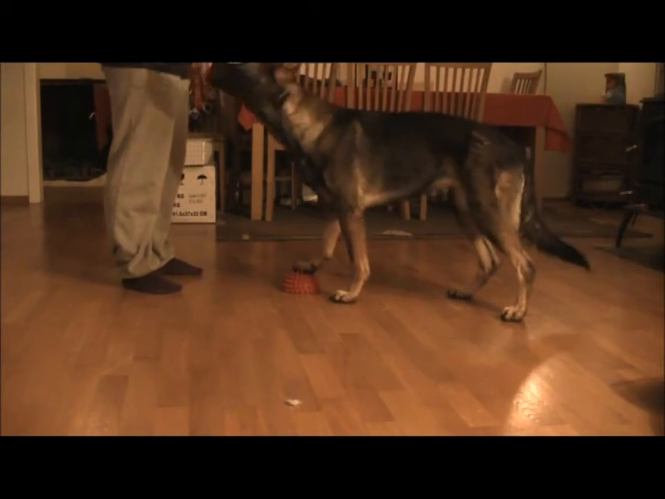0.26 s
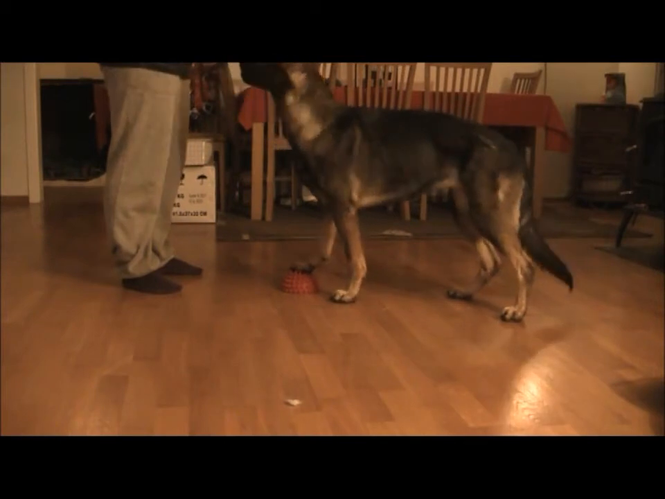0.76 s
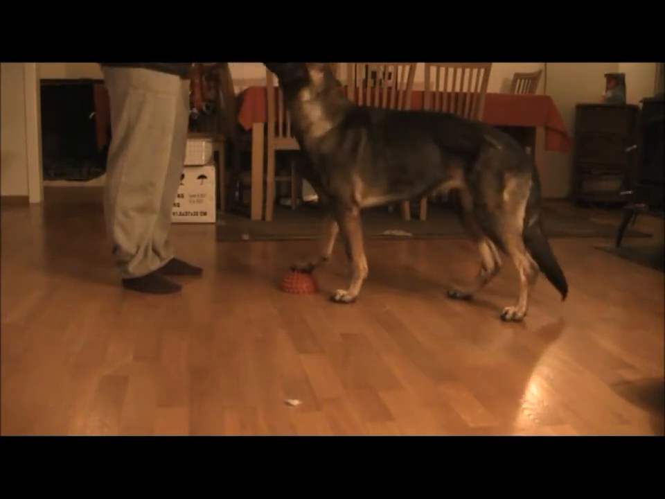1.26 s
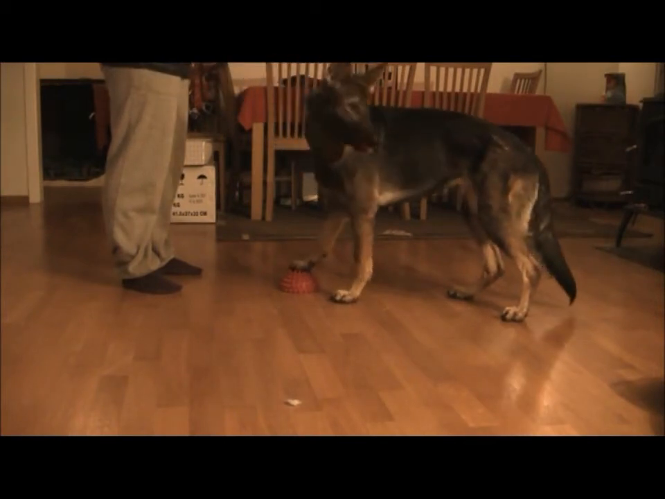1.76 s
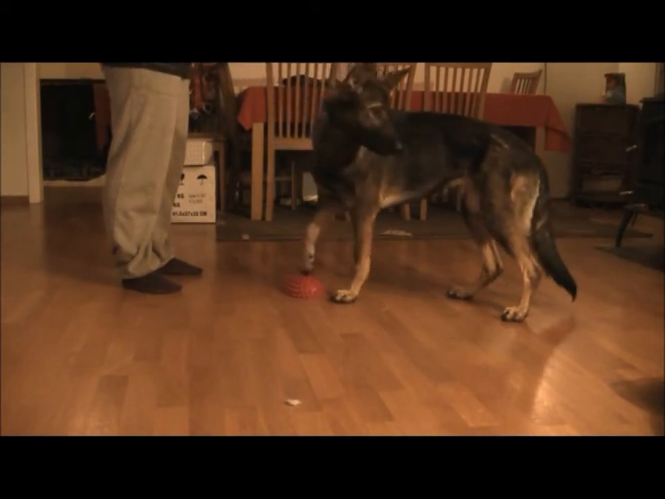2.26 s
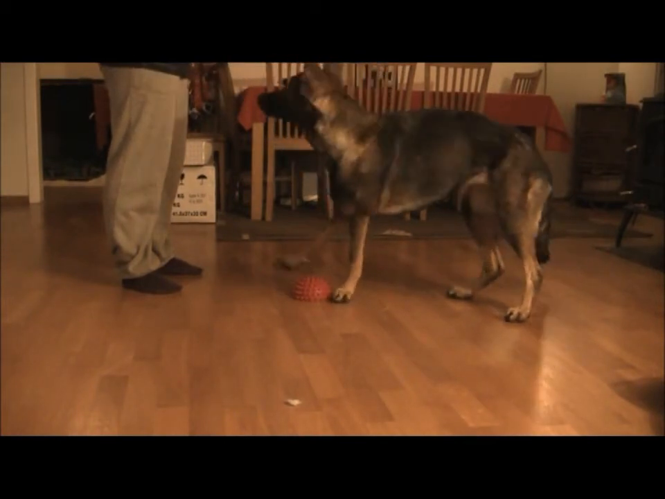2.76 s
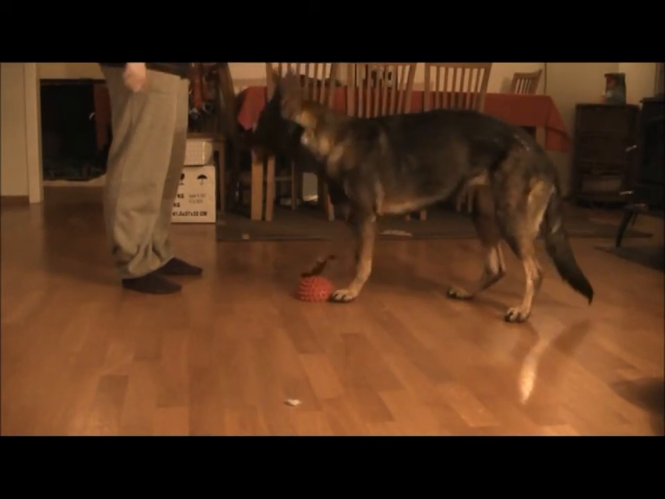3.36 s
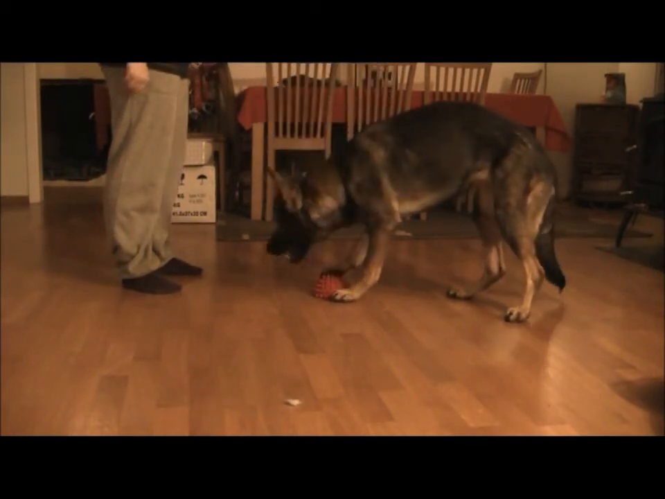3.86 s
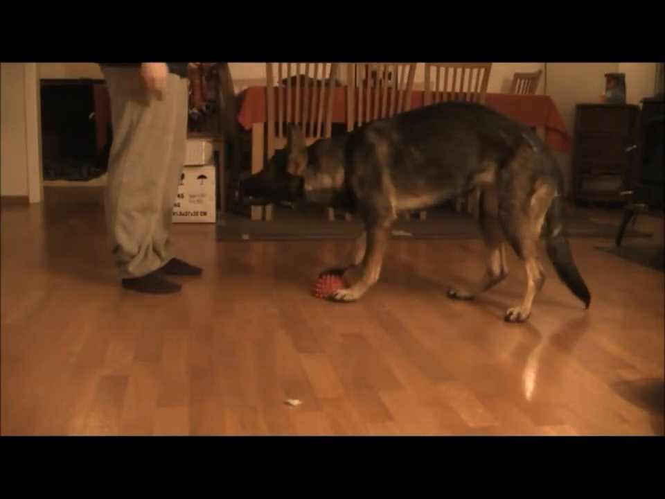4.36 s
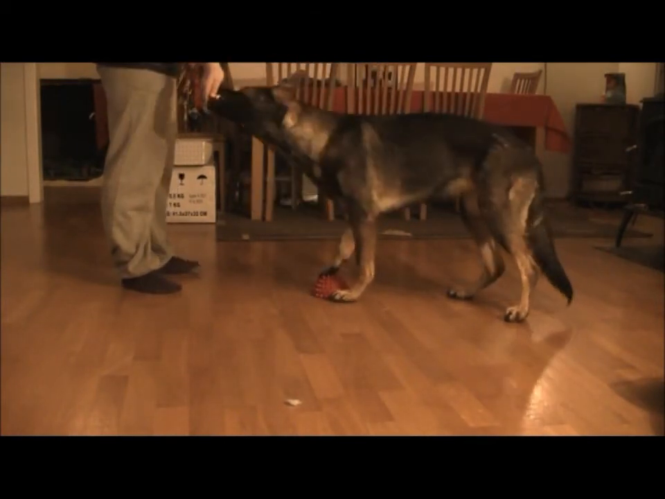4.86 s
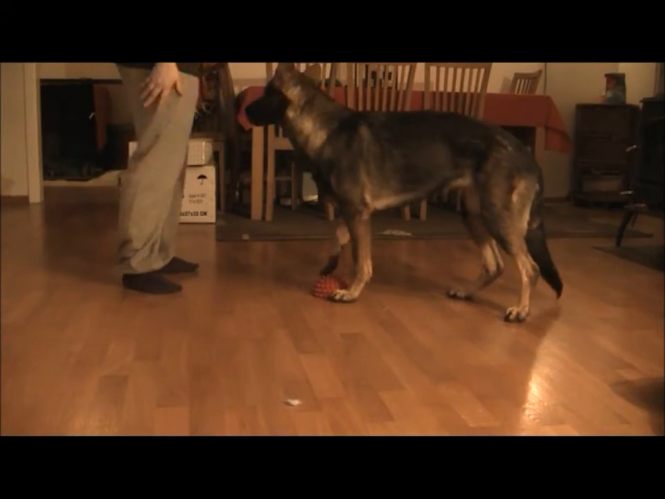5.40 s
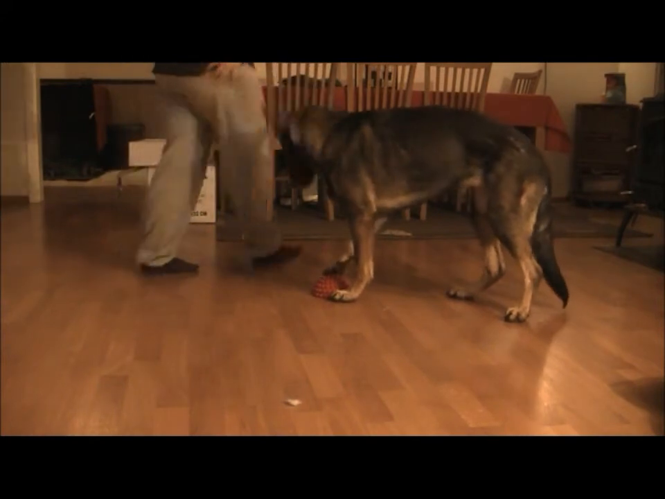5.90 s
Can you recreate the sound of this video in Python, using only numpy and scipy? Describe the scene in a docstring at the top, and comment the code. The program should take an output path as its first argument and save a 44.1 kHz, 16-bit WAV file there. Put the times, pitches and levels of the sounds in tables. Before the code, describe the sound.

A large dog's claws clack and pads thud lightly on a hardwood floor indoors, with one loud sharp knock midway, over faint camera hiss.

```python
"""A large dog shifts its feet around a rubber toy on a hardwood floor in a living room.
Claws clack as short damped resonances; pads thud as shaped clicks and scuff as runs of tiny slips.
One loud sharp knock, as it lunges down, is a broad blow with hard contacts and ringing boards.
Hollow clacks of the jaws, rasps, faint squeaks and bright pips come in between.
Random reflections make the room ring briefly, over the hiss and hum of a small camera."""
import sys
import numpy as np
from scipy import signal
from scipy.fft import rfft, irfft
from scipy.io import wavfile
from scipy.ndimage import uniform_filter1d

SR = 44100
rng = np.random.default_rng(int(sys.argv[2]) if len(sys.argv) > 2 else 0)


def dump(signal):
    """Clip the signal to [-1, 1] and save it as 16-bit WAV at the path in sys.argv[1]."""
    limited = np.clip(np.atleast_2d(signal).T, -1, 1)
    pcm = np.round(limited * 32767).astype(np.int16)
    wavfile.write(sys.argv[1], SR, pcm)


N = 270628


def gain_of(db):
    """Decibels to an amplitude factor."""
    return 10 ** (np.asarray(db) / 20)


def evened(x):
    """Scales to an rms of 1."""
    return x / np.sqrt(np.mean(x ** 2) + 1e-20)


def burst(x):
    """Scales a short sound to the energy of 20 ms at an rms of 1."""
    return x * np.sqrt(SR / 50 / np.sum(x ** 2))


def read(points, hz):
    """Interpolates a table on a log-frequency axis."""
    f, value = np.transpose(points)
    return np.interp(np.log(hz + 1), np.log(f + 1), value)


def add(mix, s, sound):
    """Mixes a sound in at a time in seconds."""
    part = mix[round(s * SR):][:len(sound)]
    part += sound[:len(part)]


def click(points, size=4096):
    """A causal, minimum-phase click with the given spectrum."""
    hz = abs(np.fft.fftfreq(size, 1 / SR))
    log_gain = np.log(gain_of(read(points, hz)))
    spectrum = np.exp(np.conj(signal.hilbert(log_gain)))
    return burst(np.fft.ifft(spectrum).real[:size // 2])


def ring(hz, width_hz, order=1, size=4096):
    """A damped resonance that swells and dies; a higher order has steeper spectral flanks."""
    t = np.arange(size) / SR
    envelope = t ** order * np.exp(-np.pi * width_hz * t)
    return burst(envelope * np.sin(2 * np.pi * hz * t))


def hollow(modes, pitch=1):
    """A cavity rings with several resonances at once, of alternating sign."""
    return burst(sum((-1) ** k * gain_of(db) * ring(hz * pitch, width_hz)
                     for k, (hz, width_hz, db) in enumerate(modes)))


def grains(grain_db, size=N):
    """Friction: a dense run of tiny slips of uneven size."""
    slip_db = grain_db * np.minimum(rng.exponential(1, size), 5)
    return rng.standard_normal(size) * gain_of(slip_db)


def crackle(decay_s, grain_db, size=2048):
    """Tiny slips that die away exponentially after a contact."""
    decay = np.exp(-np.arange(size) / SR / decay_s)
    return burst(grains(grain_db, size) * decay)


def drag(length_s, hz, width_hz, grain_db, glide_oct=0, fade=0.62, size=4096):
    """A short run of slips feeds one resonance, which glides by so many octaves during the run."""
    span, t = max(round(length_s * SR), 8), np.arange(size) / SR
    slips = grains(grain_db, span) * signal.windows.tukey(span, min(fade, 1))
    slips = np.pad(slips, (0, size))
    progress = np.minimum(np.arange(len(slips)) / span, 1)
    pitch_hz = hz * 2 ** (glide_oct * (progress - .5))
    # resonate at 0 Hz in the gliding frame, then shift back up
    turn = np.exp(2j * np.pi * np.cumsum(pitch_hz) / SR)
    decay = t * np.exp(-np.pi * width_hz * t)
    resonance = signal.fftconvolve(slips / turn, decay)[:len(slips)]
    return burst((turn * resonance).imag)


def paired(a, b, same):
    """Two unrelated spectra become left and right with a given likeness (-1..1)."""
    same = np.clip(same, -1, 1)
    mid, side = a * np.sqrt((1 + same) / 2), b * np.sqrt((1 - same) / 2)
    return np.array([mid + side, mid - side])


# hiss spectrum: f/Hz, relative level/dB
HISS_SPECTRUM = [(15, -31.5), (25, -18), (96, -3), (164, -7), (204, 0), (274, -6), (305, -5.5), (410, -4.5),
                 (631, -7.5), (703, -8.5), (2630, -17.5), (3440, -20), (4260, -23), (5280, -24.5),
                 (15500, -36.5)]
# hiss stereo: f/Hz, left-right likeness/-1..1
HISS_LIKENESS = [(40, -0.57), (130, -0.9), (640, -0.74), (1400, -0.92), (15000, -0.27)]
# motor hum partials: f/Hz, rms level/dB
HUM = [(100, -90.5), (199.5, -87.5), (301.5, -81.5), (651, -87.5)]


def camera(hiss_db=-64):
    """Steady microphone hiss as shaped noise and a faint motor hum as sines."""
    hz, t = np.fft.rfftfreq(N, 1 / SR), np.arange(N) / SR
    noise = rfft(rng.standard_normal((2, N)))
    z = paired(*noise, read(HISS_LIKENESS, hz)) * gain_of(read(HISS_SPECTRUM, hz))
    hum = sum(np.sqrt(2) * gain_of(db) * np.sin(2 * np.pi * (f * t + rng.random())) for f, db in HUM)
    return gain_of(hiss_db) * evened(irfft(z, N)) + hum


def lens(tick_db=-85, hz=4600, width_hz=600, share=0.68, jitter_s=0.0023):
    """The focus motor ticks very faintly on most of its 25 steps a second."""
    out, times = np.zeros(N), np.arange(.02, N / SR, .04)
    for s, (chance, late) in zip(times, rng.random((len(times), 2))):
        if chance < share:
            add(out, s + jitter_s * late, gain_of(tick_db) * ring(hz, width_hz))
    return out


# reverberation: f/Hz, t60/s
ROOM_T60 = [(80, 0.13), (170, 0.34), (480, 0.41), (1000, 0.47), (2700, 0.47), (5400, 0.36), (8000, 0.33),
            (14000, 0.22)]
# reverberation stereo: f/Hz, left-right likeness/-1..1
ROOM_LIKENESS = [(100, 0.94), (640, 0.95), (1400, 0.76), (3100, 0.55), (6800, 0.41), (15000, .05)]
# reverberation spectrum: f/Hz, relative level/dB
ROOM_COLOUR = [(100, -3.5), (600, 0.5), (1500, -4), (3000, -2), (6000, 0.5), (9000, 0), (14000, 0)]


def room(x, first_s=.003, early_db=4.0, early_s=0.011, size=256):
    """Reflections of random sign, strongest from nearby furniture; each band dies at its own speed."""
    t = np.arange(SR) / SR
    present = (rng.random((2, SR)) < .1) * (t > first_s)
    reflections = rng.choice([-1., 1.], (2, SR)) * present
    reflections *= gain_of(early_db * np.exp(-t / early_s))
    hz, at, z = signal.stft(reflections, SR, nperseg=size)
    decay_db = -60 * at / read(ROOM_T60, hz)[:, None]
    z = paired(*z, read(ROOM_LIKENESS, hz)[:, None])
    z = z * gain_of(read(ROOM_COLOUR, hz)[:, None] + decay_db)
    tail = signal.istft(z, SR, nperseg=size)[1]
    return signal.fftconvolve(x[None], tail / np.linalg.norm(tail[0]), axes=1)[:, :N]


def moving_room(x, turn_hz=17, count=3):
    """Each contact is at a slightly different spot: its time sets its mix of several reflection sets."""
    turns = turn_hz * np.arange(N) / SR
    return sum(room(x * np.sqrt(2 / count) * np.cos(2 * np.pi * (turns + k / count)))
               for k in range(count))


def low_cut(x, edge_hz=70, order=2):
    """A gentle highpass takes the deep bass out of all contact sounds and their reflections."""
    return signal.sosfilt(signal.butter(order, edge_hz, "highpass", fs=SR, output="sos"), x)


# paws, fur and cloth, before and after the lunge: t/s, body level/dB, hiss level/dB (before rest floor, trims)
RUSTLE = [
    [(0.0, -70, -69.5), (0.34, -69.5, -74), (1.14, -71.5, -75.5), (2.11, -68, -72.5), (2.24, -65.5, -68),
     (2.56, -71, -76.5), (2.85, -68, -72), (3.07, -68.5, -72), (3.36, -68.5, -73.5), (3.66, -64.5, -70)],
    [(4.05, -70.5, -75.5), (4.15, -71, -79), (4.42, -70, -74.5), (4.68, -69, -72), (4.89, -68.5, -68),
     (4.99, -68.5, -72.5), (5.19, -69, -74), (5.75, -70.5, -71.5), (5.89, -67.5, -71), (6.13, -72.5, -69.5)],
]
# dull part: f/Hz, relative level/dB
RUSTLE_BODY = [(60, -19.5), (170, 6), (350, 2), (800, 1), (1700, 2), (2600, -5), (4000, -40)]
# bright part: f/Hz, relative level/dB
RUSTLE_HISS = [(1200, -13.5), (2600, 4), (4500, -0.5), (7000, -9.5), (10000, -15.5), (15000, -22)]


def rustle(grain_db=5.0, body_db=-0.94, hiss_db=-2, body_rest_db=-73, hiss_rest_db=-77):
    """Grainy sliding noise, dull and bright, as far as its level exceeds a rest floor."""
    s, body, hiss = np.vstack(RUSTLE).T
    parts = ((body, body_rest_db, body_db, RUSTLE_BODY),
             (hiss, hiss_rest_db, hiss_db, RUSTLE_HISS))
    out, t = np.zeros(N), np.arange(N) / SR
    for level_db, rest_db, trim_db, colour in parts:
        motion = np.sqrt(np.maximum(gain_of(level_db) ** 2 - gain_of(rest_db) ** 2, 0))
        noise = evened(signal.oaconvolve(grains(grain_db), click(colour))[:N])
        out += gain_of(trim_db) * np.interp(t, s, motion) * noise
    return out


# tiny bright pips: t/s, level/dB (before trims), settled f/Hz, fall into it/share of f, swell/s
PIPS = [(0.629, -58.5, 2450, 0.082, 0.0053), (0.952, -61.5, 2420, .08, 0.0048),
        (1.120, -63.5, 3420, 0.116, 0.0084), (1.229, -76, 4670, .03, 0.0097),
        (1.553, -74, 5680, 0.11, 0.0072), (2.554, -69, 5150, 0.21, 0.0057), (3.115, -65, 3340, .1, 0.0069),
        (4.054, -65.5, 3150, 0.12, 0.0035), (4.061, -64.5, 2586, 0.093, .006),
        (4.099, -66.5, 2705, 0.14, .002), (4.354, -72, 5120, 0.16, .004)]


def pips(settle_s=0.00293, pip_db=-4.0, fuzz_db=-5.0, fuzz_width=0.12, fuzz_swells=2.6, size=4096):
    """Pings swell, drop onto their pitch and die within hundredths of a second, blurred by a crackle."""
    out, t = np.zeros(N), np.arange(size) / SR
    for s, db, hz, fall, swell_s in PIPS:
        pitch_hz = hz * (1 + fall * np.exp(-t / settle_s))
        phase = 2 * np.pi * np.cumsum(pitch_hz) / SR
        swell = (t * np.exp(-t / swell_s)) ** 2
        fuzz = drag(fuzz_swells * swell_s, hz, fuzz_width * hz, grain_db=3.5, glide_oct=-fall)
        add(out, s, gain_of(db + pip_db) * burst(swell * np.sin(phase)))
        add(out, s, gain_of(db + fuzz_db) * fuzz)
    return out


# rubbing rubber and pads: start t/s, length/s, level/dB (before trim), first f/Hz, last f/Hz,
# octave above/dB re fundamental
SQUEAKS = [(0.0, 0.0082, -54.5, 1045, 1025, -15), (3.365, 0.057, -60.5, 1325, 1186, -14),
           (3.497, 0.085, -60.5, 949, 917, -1), (4.544, .075, -58.5, 215.3, 247, -11.5),
           (4.773, 0.058, -67, 1098, 1214, -16), (6.031, 0.015, -60, 1960, 1460, -25)]


def squeaks(jitter=.03, jitter_s=.002, fade=0.72, squeak_db=-2):
    """Sticking and slipping falls into step for a moment: an unsteady gliding tone and its octave."""
    out = np.zeros(N)
    for s, length_s, db, first_hz, last_hz, octave_db in SQUEAKS:
        size = round(length_s * SR)
        wobble = uniform_filter1d(rng.standard_normal(size), max(round(jitter_s * SR), 1))
        pitch_hz = np.linspace(first_hz, last_hz, size) * (1 + jitter * evened(wobble))
        phase = 2 * np.pi * np.cumsum(pitch_hz) / SR
        tone = np.sin(phase) + gain_of(octave_db) * np.sin(2 * phase)
        tone *= signal.windows.tukey(size, min(fade, 1))
        add(out, s, gain_of(db + squeak_db) * evened(tone))
    return out


# hollow rasps: start t/s, length/s, level/dB
RASPS = [(0.268, 0.014, -64), (0.278, .02, -52.5), (0.335, 0.065, -70)]
# resonances of their hollow: f/Hz, width/Hz, relative level/dB
RASP_HOLLOW = [(780, 240, -1.5), (1995, 400, -3.5), (2790, 690, -14), (3220, 330, -20), (3940, 520, -20),
               (4920, 590, -12.5), (7050, 1000, -22)]


def rasps(grain_db=6):
    """Ragged runs of slips sound through one tube-like hollow."""
    out, cavity = np.zeros(N), hollow(RASP_HOLLOW)
    for s, length_s, db in RASPS:
        slips = grains(grain_db, round(length_s * SR))
        slips *= signal.windows.tukey(len(slips), .7)
        add(out, s, gain_of(db) * burst(signal.fftconvolve(slips, cavity)))
    return out


# hollow clacks, probably of the jaws, one list of contacts a bite: t/s, level/dB, pitch factor,
# smack/dB re clack
CLACKS = [
    [(0.7672, -67.5, 1.4, 2), (0.7698, -54.5, 0.98, 0), (0.7775, -59.5, 1.05, -1.5), (0.786, -64, 1.46, 1),
     (0.7945, -62.5, 1.13, -3)],
    [(3.2325, -54, 1.055, 2), (3.240, -56.5, 1.02, -1), (3.2505, -56, 1.02, -2)],
    [(5.3878, -70, 2.0, 0), (5.3918, -60, 1.35, -2), (5.3935, -47.5, 0.97, -12), (5.3985, -53.5, 1.03, -5),
     (5.4135, -57, 1.02, -5), (5.423, -57, 1.01, -2)],
]
# hollow of the mouth, one list a bite: f/Hz (before pitch factor), width/Hz, relative level/dB
MOUTHS = [
    [(540, 59, -11), (890, 140, -10), (1228, 230, 2.5), (1580, 260, 0), (1990, 240, -7), (2340, 260, 0.5),
     (2800, 340, -10), (3380, 960, -8), (4140, 580, -8.5), (5770, 2600, -14.5)],
    [(830, 84, -6), (1000, 200, -19), (1290, 240, 2), (1510, 240, -9), (1830, 240, 1.5), (2120, 200, -11),
     (2340, 200, -9)],
    [(853, 180, -14.5), (1172, 160, -2.5), (1380, 280, -6), (1560, 110, 0), (1820, 200, -5),
     (2400, 240, -9.5), (3150, 470, -11), (3680, 330, -16), (4240, 300, -13), (5130, 250, -16.5),
     (7260, 3000, -22.5)],
]


def jaws(smack_s=0.007, grain_db=5):
    """The teeth rattle and ring the hollow of the mouth; a short wet smack goes with each contact."""
    out = np.zeros(N)
    for contacts, modes in zip(CLACKS, MOUTHS):
        for s, db, pitch, smack_db in contacts:
            mouth = hollow(modes, pitch)
            smack = burst(signal.fftconvolve(mouth, crackle(smack_s, grain_db)))
            add(out, s, gain_of(db) * mouth)
            add(out, s, gain_of(db + smack_db) * smack)
    return out


# floor and room modes: f/Hz, relative level/dB, t60/s
BOARDS = [(97, -20.5, .55), (153.1, 0, 0.35), (175, 4, 0.35), (214, 1, 0.28), (260, -1.5, 0.36),
          (343.3, -8, 0.56), (411, -6, 0.39), (473, -1.5, 0.42), (573, 9, 0.22), (684, -3, 0.38),
          (735, -10, 0.4), (880, -5, 0.37), (960, -14, .45), (1170, -1, .17), (1160, 2, 0.17),
          (1298, 4, .16), (1510, 3, 0.11), (1780, -6, .12), (2010, -4, .13), (2490, -9, .12),
          (3020, -10, 0.31)]


def boards(ring_db=-28.0, rise_s=0.00071):
    """The floor's modes ring on after the first blow of the knock."""
    out, t = np.zeros(N), np.arange(SR) / SR
    modes = sum(gain_of(db - 60 * t / t60) * np.sin(2 * np.pi * (hz * t + rng.random()))
                for hz, db, t60 in BOARDS)
    onset = (1 - np.exp(-t / rise_s)) ** 2
    add(out, KNOCKS[0][0], gain_of(ring_db) * burst(modes * onset))
    return out


# hard first contacts and the rattle after them: t/s, level/dB, f/Hz
CRACKS = [(3.6994, -35.5, 2370), (3.7016, -34, 1730), (3.7018, -33.5, 1290), (3.7020, -42.5, 2900),
          (3.7045, -41, 1570), (3.7085, -48.5, 4880), (3.7215, -50, 2900), (3.7715, -51, 2380)]


def crack(width_hz=650):
    """Hard contacts in quick succession give the knock its sharp front."""
    out = np.zeros(N)
    for s, db, hz in CRACKS:
        add(out, s, gain_of(db) * ring(hz, width_hz))
    return out


# loud knock and its rebounds: t/s, level/dB (before direct and room trims)
KNOCKS = [(3.7016, -32.5), (3.708, -49), (3.7194, -56), (3.7504, -47.5)]
# spectrum of a blow: f/Hz, relative level/dB
BLOW = [(50, -56), (100, -5), (125, -9), (165, 5), (240, 4.5), (380, -3), (470, -1.5), (600, 2.5),
        (1050, -4.5), (1800, -5), (3000, -6), (3700, -12), (5000, -20), (7000, -26.5), (10000, -37.5),
        (15000, -51)]


def knock():
    """A heavy broad blow and its softer rebounds."""
    out, blow = np.zeros(N), click(BLOW)
    for s, db in KNOCKS:
        add(out, s, gain_of(db) * blow)
    return out


# single light touches of a claw: t/s, level/dB, f/Hz
TAPS = [(0.307, -73, 7500), (0.351, -64, 1310), (0.419, -73, 5770), (0.495, -79, 11100), (0.755, -76, 2600),
        (1.51, -78, 2020), (1.963, -66.5, 1550), (2.064, -61.5, 1620), (2.189, -62.5, 1640),
        (2.245, -64, 1620), (2.312, -62, 1610), (2.427, -66, 1710), (2.955, -67, 2000), (3.612, -65, 1450),
        (3.644, -62, 1500), (4.1004, -67.5, 3700), (4.547, -62, 3000), (4.604, -68.5, 3900),
        (4.769, -70.5, 4560), (4.775, -68, 4380), (4.876, -78.5, 10500), (4.893, -66, 2730),
        (5.168, -70, 1400), (5.692, -76, 4550), (5.979, -59, 2300), (5.989, -62, 2600)]


def taps(width_share=1.0):
    """One claw touches down alone: a heavily damped resonance."""
    out = np.zeros(N)
    for s, db, hz in TAPS:
        add(out, s, gain_of(db) * ring(hz, width_share * hz, order=3))
    return out


# short band noises apart from the footfalls: rubs, and a swell into and rumble after the knock:
# start t/s, length/s, level/dB (before trim), f/Hz, width/share of f,
# upper f/Hz, upper level/dB re lower, glide/octaves
BAND_NOISES = [(0.0, 0.09, -73, 930, 0.36, 1870, 1.5, -0.16),
               (0.06, .18, -77.5, 2650, 0.14, 875, 0, -0.045),
               (0.212, 0.038, -68.5, 600, .35, 2400, -6, -0.14),
               (0.333, 0.074, -65, 1060, 0.79, 4200, -1.5, .2), (0.425, 0.11, -73, 600, 2.3, 2150, 8, .1),
               (0.445, .07, -71, 258, 0.52, 523, -4, -0.21), (1.488, 0.069, -67, 2040, 1, 5000, -4, .1),
               (1.65, 0.052, -65, 690, 0.39, 2930, -6, 0.3), (1.777, 0.029, -61, 405, 0.58, 920, 0.5, 0.02),
               (1.99, 0.3, -67.5, 1600, 0.5, 4150, -5.5, 0.17),
               (2.1, 0.33, -71.5, 2820, .4, 7000, -12, 0.016),
               (2.757, 0.042, -67, 330, 0.87, 1090, -18, .1),
               (2.84, 0.2, -62.5, 176, 0.39, 940, -8.5, 0.0099),
               (2.974, 0.042, -53, 153, 0.17, 279, -7, 0.0019),
               (3.335, 0.093, -60.5, 1240, 0.61, 2180, -5.5, .1),
               (3.49, 0.075, -63.5, 940, 0.35, 1990, 0.5, .05),
               (3.683, 0.032, -42, 1640, 0.49, 3400, -21, 0.11),
               (3.738, 0.068, -45, 670, 0.4, 1320, -4, .1), (4.559, 0.064, -67, 230, 0.15, 500, -6, 0.077),
               (4.68, 0.043, -69, 182, .3, 900, -10, -.2),
               (4.796, 0.125, -62, 2600, 0.44, 5960, -10.5, .35),
               (4.868, 0.043, -67.5, 880, 0.37, 3680, 0, -.1), (5.02, 0.089, -68, 1300, 1.7, 2870, 3, -.2),
               (5.099, 0.056, -64, 554, 0.39, 1350, -3.5, .15),
               (5.155, 0.044, -65, 1920, 0.14, 1340, -6, 0.033),
               (5.356, 0.079, -64.5, 189, 0.45, 402, -5.5, -0.072),
               (5.686, 0.077, -68.5, 1530, 0.3, 2300, -12, 0.14),
               (5.755, 0.073, -66.5, 238, 0.86, 1650, -2, 0.06),
               (5.855, 0.041, -63, 1610, .2, 2210, -7, .1), (6.034, 0.04, -57, 458, 0.89, 1520, -8, -0.1)]


def band_noises(grain_db=2.0, trim_db=-2.0, fade=0.44):
    """Grainy noise through two gliding resonances; a longer one carries more energy."""
    out = np.zeros(N)
    for s, length_s, db, hz, width_share, upper_hz, upper_db, glide_oct in BAND_NOISES:
        lower, upper = (drag(length_s, f, width_share * f, grain_db, glide_oct, fade)
                        for f in (hz, upper_hz))
        noise = (lower + gain_of(upper_db) * upper) * np.sqrt(length_s / 0.02)
        add(out, s, gain_of(db + trim_db) * noise)
    return out


def claws(spread_s, follow_db=-2, pitch_scatter=0.49, count=4):
    """The first claw lands, the others follow more softly on own pitches: delay/s, force, pitch factor."""
    index = np.arange(count)
    later = index > 0
    delay_s = later * abs(spread_s) * (index - rng.random(count) / 2) / (count - 1)
    softer = gain_of(follow_db) * min(abs(spread_s) / 0.0018, 1)  # claws landing together make one click
    force = np.where(later, softer * rng.choice([-1, 1], count), 1)
    pitch = np.exp(later * pitch_scatter * (2 * rng.random(count) - 1))
    return zip(delay_s, force / np.linalg.norm(force), pitch)


# footfalls: t/s, clack level/dB, clack f/Hz, tick level/dB, pad level/dB, skid f/Hz, claw spread/s
# (levels before trims; first claw at clack f, the others scattered around it)
STEPS = [(0.284, -72, 2760, -59, -70.5, 385, .022), (1.332, -63.5, 1460, -71.5, -73.5, 207, 0.0028),
         (1.661, -62, 835, -69.5, -75, 620, 0.016), (1.794, -56, 1000, -69.5, -63, 385, 0.0097),
         (1.823, -61, 1140, -70, -68, 292, 0.007), (2.374, -55, 1210, -68.5, -67.5, 305, 0.0078),
         (2.583, -57.5, 1320, -71, -69.5, 263, 0.0052), (2.97, -47.5, 1230, -53.5, -51.5, 239, 0.022),
         (3.643, -60, 1230, -97, -61.5, 200, 0.00083), (4.437, -66.5, 1540, -84, -70.5, 200, 0.0009),
         (4.497, -64, 1360, -69.5, -64.5, 183, 0.0039), (4.540, -48, 1930, -58, -56.5, 225, 0.0089),
         (5.968, -79, 2000, -56.5, -85, 300, 0.002), (5.9721, -47.5, 1690, -68, -81, 298, 0.00026),
         (5.9789, -57, 1740, -57.5, -82, 300, .006), (6.039, -58, 1590, -75, -76, 430, 0.0061)]


def skids(grain_db=4, graze_s=.006):
    """Each pad judders briefly over the varnish as it takes the weight; claw tips scratch along."""
    skid_s, skid_db, skid_width = 0.032, -5, 0.29  # dB re pad, width as share of f
    slow_hz, db_per_octave = 185, 7.5  # a faster slide is higher and louder
    scratch_s, scratch_db, scratch_hz, scratch_width_hz = 0.041, -4.5, 4460, 5400  # dB re tick
    out = np.zeros(N)
    for s, _, _, tick_db, pad_db, hz, _ in STEPS:
        start_s = s - graze_s  # the paw grazes the floor before it lands
        db = pad_db + skid_db + db_per_octave * np.log2(hz / slow_hz)
        scratch = drag(scratch_s, scratch_hz, scratch_width_hz, grain_db)
        add(out, start_s, gain_of(db) * drag(skid_s, hz, skid_width * hz, grain_db))
        add(out, start_s, gain_of(tick_db + scratch_db) * scratch)
    return out


# claw tip spectrum: f/Hz, relative level/dB
TICK = [(200, -51), (900, -34.5), (2800, 16.5), (5000, 6), (8000, -4.5), (11000, -10.5), (15000, -15)]
# pad spectrum: f/Hz, relative level/dB
THUD = [(50, -47), (90, -28.5), (125, -15.5), (160, -6.5), (230, -2.5), (330, -4.5), (600, -3), (1200, -18),
        (4000, -49)]


def steps(clack_width_hz=1200, clack_db=-2, tick_db=-3, thud_db=-2, pad_lag=0.4, grain_db=4,
          tick_decay_s=0.0011):
    """Claws tick and clack on the wood while the pad thuds down among them."""
    out, tip, thud = np.zeros(N), click(TICK), click(THUD)
    for s, clack_level, hz, tick_level, pad_level, _, spread_s in STEPS:
        for delay_s, force, pitch in claws(spread_s):
            clack = ring(hz * pitch, clack_width_hz, order=2)
            tick = burst(signal.fftconvolve(tip, crackle(tick_decay_s, grain_db)))
            add(out, s + delay_s, force * gain_of(clack_level + clack_db) * clack)
            add(out, s + delay_s, force * gain_of(tick_level + tick_db) * tick)
        add(out, s + pad_lag * spread_s, gain_of(pad_level + thud_db) * thud)
    return out


def scene(paw_room_db=1, noise_room_db=-2, tap_room_db=-3, jaw_room_db=-1, knock_room_db=5.0,
          knock_direct_db=-3, crack_room_db=-6, pip_room_db=-1, left_db=0.3):
    """Contact sounds arrive directly and, all but the boards, by way of the room; camera noise is added."""
    paws = steps() + skids() + rasps() + rustle()
    noises = band_noises() + squeaks()
    tips, mouth, blow, front, pings = taps(), jaws(), knock(), crack(), pips()
    direct = paws + noises + tips + mouth + gain_of(knock_direct_db) * blow + front + pings + boards()
    sent = gain_of(paw_room_db) * paws + gain_of(noise_room_db) * noises
    sent += gain_of(tap_room_db) * tips + gain_of(jaw_room_db) * mouth
    sent += gain_of(knock_room_db) * blow + gain_of(crack_room_db) * front
    sent += gain_of(pip_room_db) * pings
    heard = low_cut(direct + moving_room(sent)) + camera() + lens()
    return heard * gain_of([[left_db], [-left_db]])


def record(dry, edge_hz=15400):
    """The camera's band limit: a linear-phase lowpass."""
    lowpass = signal.firwin(511, edge_hz, window=("kaiser", 9), fs=SR)
    return signal.oaconvolve(dry, lowpass[None], "same")


dry = scene()
out = record(dry)
dump(out)
```